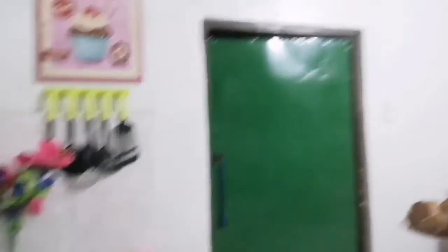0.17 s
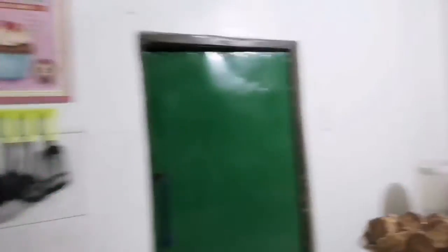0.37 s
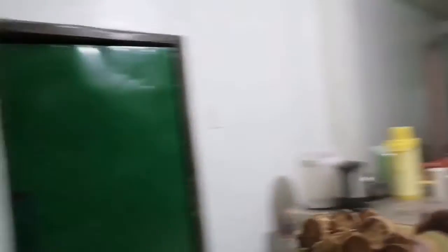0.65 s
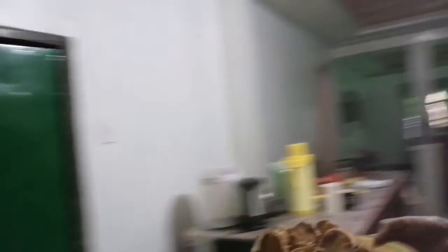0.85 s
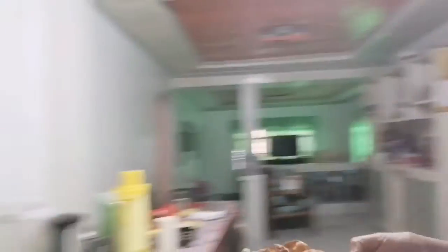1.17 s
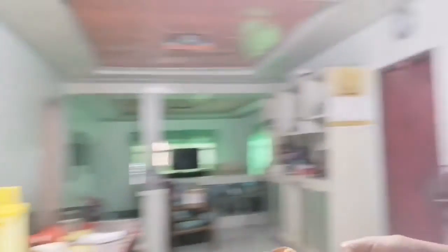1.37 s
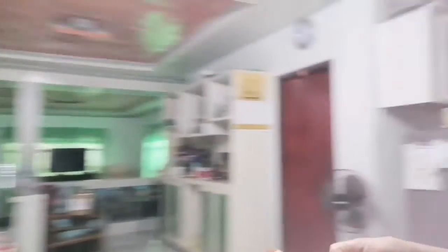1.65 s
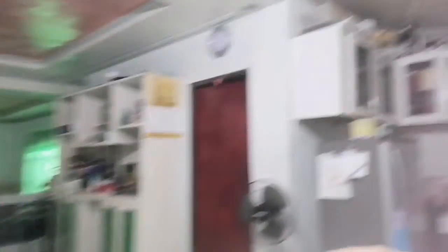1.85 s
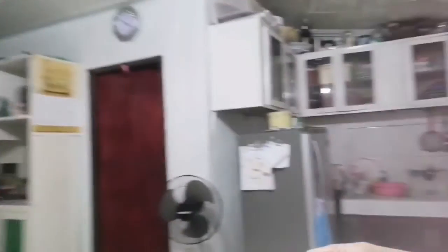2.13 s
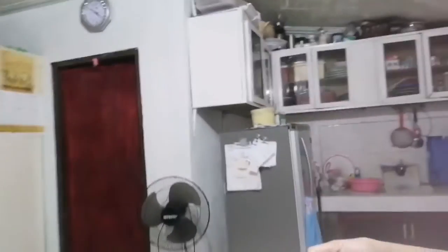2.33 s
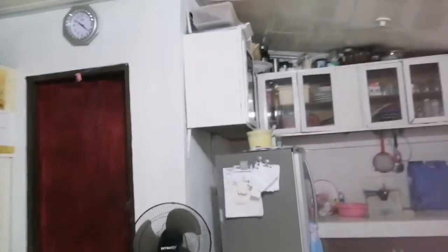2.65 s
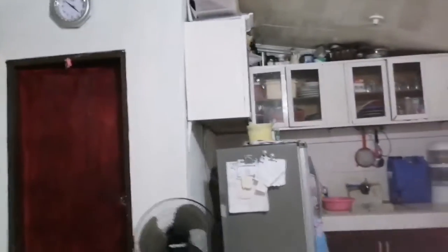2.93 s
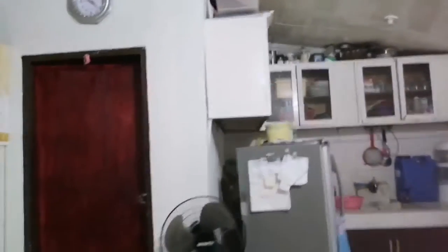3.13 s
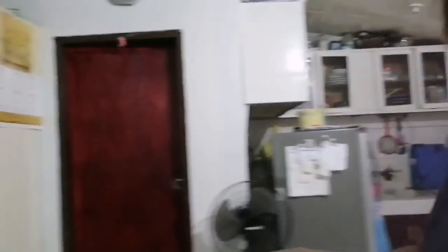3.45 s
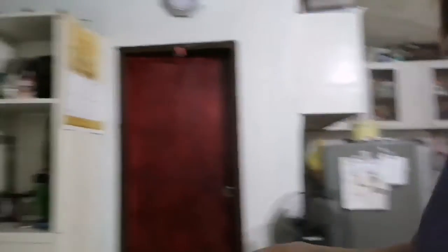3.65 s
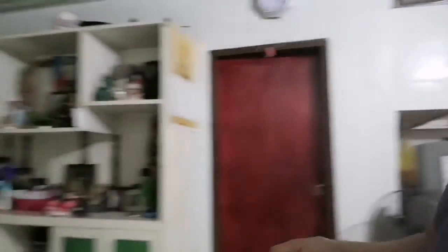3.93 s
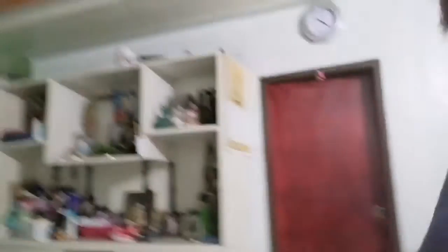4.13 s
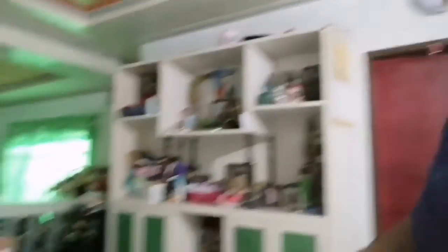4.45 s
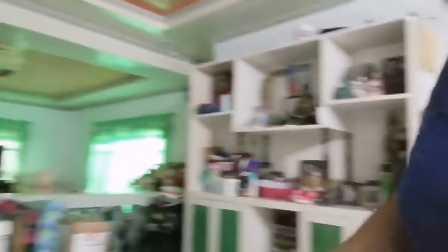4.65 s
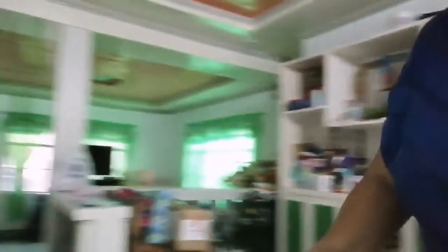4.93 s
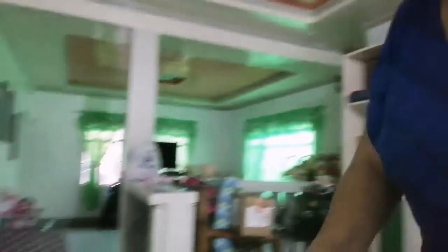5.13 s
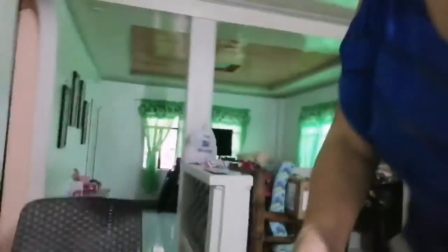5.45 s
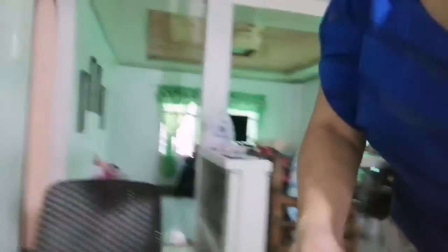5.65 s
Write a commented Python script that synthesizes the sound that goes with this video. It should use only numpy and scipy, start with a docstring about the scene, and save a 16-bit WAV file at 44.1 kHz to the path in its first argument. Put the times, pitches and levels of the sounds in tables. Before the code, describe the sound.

A rooster gasps and crows once, hoarse then clean and falling, ringing in a hard-walled house over faint hum, followed by light knocks and shuffles.

```python
"""Rooster crowing in a house

A rooster crows once between hard walls: a wheezy gasp, a hoarse two-voiced call, a clean falling last note.
The call is built from two sets of harmonics, one for each side of the voice organ, plus rasping noise.
A motor hums faintly, made of wavering tones in a dull rumble. Shaped noise makes the shuffles, rustles,
knocks and clicks; gliding tones make the squeaks, and low tones make the booms.
"""
import sys
import numpy as np
from scipy import signal
from scipy.fft import rfft, irfft, next_fast_len
from scipy.io import wavfile

SR = 44100
rng = np.random.default_rng(int(sys.argv[2]) if len(sys.argv) > 2 else 0)


def store_wav(level_fs):
    """Save 16-bit WAV to argv[1]."""
    pcm = np.round(np.clip(np.atleast_2d(level_fs), -1, 1) * 32767)
    wavfile.write(sys.argv[1], SR, pcm.T.astype(np.int16))


N = 255293
FFT_SIZE = next_fast_len(N, True)
TIME, BINS = np.arange(N) / SR, np.fft.rfftfreq(FFT_SIZE, 1 / SR)  # [s], [Hz]
# Levels in the tables are relative: the functions that play them may add a gain.


def amp(db):
    """Turns decibels into gain."""
    return 10 ** (np.asarray(db) / 20)


def unit(x):
    """Scales to rms 1."""
    return x / np.sqrt(np.mean(x ** 2) + 1e-20)


def read(points, hz):
    """Reads a spectrum's value at hz, on a log-frequency axis."""
    f, value = np.transpose(points)
    return np.interp(np.log(hz + 1), np.log(f + 1), value)


def curves(rows):
    """Draws each column of a timed table at every sample."""
    s, *columns = np.transpose(rows)
    return [np.interp(TIME, s, c) for c in columns]


def during(rows, fade=.008):
    """Gives 1 while a timed table lasts, with soft edges (fade in s)."""
    since_start, until_end = TIME - rows[0][0], rows[-1][0] - TIME
    return np.clip(np.minimum(since_start, until_end) / fade + .5, 0, 1)


def swell(start, attack, hold, release, db):
    """A gain that rises, holds, and then dies by 60 dB in the release time; times in s."""
    age = TIME - start
    return np.clip(age / attack, 0, 1) * amp(db - 60 * np.maximum(age - attack - hold, 0) / release)


def noise():
    """White noise."""
    return rng.standard_normal(N)


def filtered(x, gain):
    """Weights every frequency of x by a gain."""
    return irfft(rfft(x, FFT_SIZE) * gain, FFT_SIZE)[..., :N]


def wobble(hz):
    """Random drift with rms 1, up to about hz."""
    return unit(filtered(noise(), 1 / (1 + (BINS / hz) ** 4)))


def coloured(x, points):
    """Gives x a spectrum; rms 1."""
    return unit(filtered(x, amp(read(points, BINS))))


def resonant(x, modes):
    """Passes x through steep-sided resonances; rms 1."""
    power = sum(amp(db) ** 2 / (1 + ((BINS - hz) / width) ** 2 * 2) ** 3 for hz, width, db in modes)
    return unit(filtered(x, np.sqrt(power)))


def panned(left_db):
    """Gains of the left and the right channel, left_db apart."""
    return amp(np.array([[.5], [-.5]]) * left_db)


def pair(points, alike, left_db):
    """Coloured noise at both microphones; alike is the shared part of its power."""
    shared = noise()
    both = [coloured(np.sqrt(alike) * shared + np.sqrt(1 - alike) * noise(), points) for _ in range(2)]
    return np.array(both) * panned(left_db)


# How long echoes take to die by 60 dB: (frequency [Hz], time [s])
ROOM_T60 = [(150, 1), (500, 0.45), (1200, 0.45), (2800, 0.44), (7000, .52), (15000, 0.56)]


def room(x, build=0.002):
    """Dense reflections that swell quickly and die band by band, different at each microphone."""
    hz, t, z = signal.stft(rng.choice([-1., 1.], (2, SR)), SR, nperseg=256)
    decay = amp(-60 * t / read(ROOM_T60, hz)[:, None])
    tail = signal.istft(z * decay, SR, nperseg=256)[1]
    tail *= 1 - np.exp(-np.arange(tail.shape[1]) / SR / build)
    return signal.fftconvolve(x[None], tail / np.linalg.norm(tail[0]), axes=1)[:, :N]


def cycles(hz, rough, jitter=.055, jitter_hz=170, waver=.0022, rough_waver=.008):
    """Phase of a vibration whose period jitters as it gets rough."""
    fast = jitter * rough * wobble(jitter_hz)
    slow = (waver + rough_waver * rough) * wobble(30)
    return 2 * np.pi * np.cumsum(hz * (1 + fast + slow)) / SR


# The motor swells and fades: (time [s], firings per second [Hz], level [dB])
MOTOR = [(0, 33.5, -60), (.8, 34, -60), (1.6, 34, -69), (2.4, 32, -64), (3.2, 32, -57), (4.22, 31.8, -54),
         (4.4, 33, -45), (4.75, 33.3, -46), (5.1, 33.6, -54), (5.79, 34, -59)]
# Its tones: (multiple of the firing rate, level [dB])
MOTOR_ORDERS = [(1, 0), (2, 0.5), (3, -11), (4, -2), (5, 2), (6, -9.5)]
# Colour of its deep and upper rumble: (frequency [Hz], level [dB])
DEEP_COLOUR = [(10, -3.5), (32, -15), (48, -4.5), (70, -6), (100, 0.5), (140, -21), (300, -55.5)]
UPPER_COLOUR = [(60, -29), (120, -2), (165, 2), (205, -6.5), (260, -16), (450, -36), (1000, -64)]
# How each rumble follows the motor: (level when the motor is at MOTOR_REF_DB [dB], follow [dB per dB])
DEEP_RUMBLE = (-55.5, .7)
UPPER_RUMBLE = (-58.5, .4)
MOTOR_REF_DB = -58


def motor(gain_db=-3):
    """Wavering multiples of the firing rate in a dull rumble; only the bass comes through the walls."""
    hz, db = curves(MOTOR)
    phase = 2 * np.pi * np.cumsum(hz * (1 + 0.0083 * wobble(4.5))) / SR
    tones = np.zeros(N)
    for order, order_db in MOTOR_ORDERS:
        drift = wobble(1.7) + 2 * np.pi * rng.random()
        tones += amp(order_db + 2.5 * wobble(4.3)) * np.cos(order * phase + drift)
    deep, upper = (amp(base_db + follow * (db - MOTOR_REF_DB)) for base_db, follow in (DEEP_RUMBLE, UPPER_RUMBLE))
    rumble = deep * pair(DEEP_COLOUR, 0.89, 4.5) + upper * pair(UPPER_COLOUR, .85, 8.1)
    return amp(gain_db) * (amp(db) * unit(tones) * panned(4.6) + rumble)


# Colour of the still air: (frequency [Hz], level [dB])
AIR = [(180, -32), (300, -0.5), (821, -4.5), (953, -10), (1780, -13.5), (3280, -9), (4140, -11.5),
       (5570, -8.5), (7750, -23.5), (9600, -17.5), (15500, -29.5)]


def still_air(level_db=-69):
    """The steady faint hiss of the house, mostly different at each microphone."""
    return amp(level_db) * pair(AIR, 0.12, 0.67)


# Steps and shifts of the body: (start [s], length [s], scuffing feet [dB], rustling cloth [dB])
MOVES = [(.19, .33, -72, -68), (.72, .16, -63, -69), (3.42, .1, -63, -76), (3.76, .18, -62, -67),
         (4.08, .03, -59, -68), (4.35, .12, -60, -72), (4.46, .04, -55, -69), (4.52, .08, -49.5, -57.5),
         (4.7, .1, -65, -73), (4.86, .08, -64, -65), (5.03, .1, -64, -72), (5.13, .11, -62.5, -60.5),
         (5.33, .03, -52, -67), (5.43, .04, -50, -52), (5.54, .25, -58, -52), (5.765, .03, -42, -60)]
# Colour of the feet and of the cloth: (frequency [Hz], level [dB])
SCUFF_COLOUR = [(150, -9), (330, -2), (600, -5), (1000, -4.5), (1600, -13.5), (3000, -19.5), (5000, -67)]
CLOTH_COLOUR = [(880, -55), (1500, -37), (1580, -9.5), (3030, -4.5), (3760, -13), (6190, 2.5), (7230, -10),
                (7750, -14.5), (9890, -8.5), (11700, -22.5), (14200, -16), (15500, -47)]
MOVE_ATTACK_S, MOVE_RELEASE_S = .025, .4
STILL_SCUFF_DB, STILL_CLOTH_DB = -71, -75  # the faint stir between moves, before the gains below


def moving(scuff_gain_db=-2, cloth_gain_db=1):
    """Feet scuff the floor and cloth rubs softly, in small uneven catches."""
    scuff, cloth = amp(STILL_SCUFF_DB), amp(STILL_CLOTH_DB)
    for s, length, feet_db, rub_db in MOVES:
        scuff = np.hypot(scuff, swell(s, MOVE_ATTACK_S, length, MOVE_RELEASE_S, feet_db))
        cloth = np.hypot(cloth, swell(s, MOVE_ATTACK_S, length, MOVE_RELEASE_S, rub_db))
    catches_db = 1.5 * wobble(60)
    feet = scuff * amp(scuff_gain_db) * pair(SCUFF_COLOUR, 0.35, 1)
    return feet + cloth * amp(cloth_gain_db + catches_db) * pair(CLOTH_COLOUR, 0.15, 7)


# Faint high squeaks and swishes:
# (start [s], length [s], start pitch [Hz], end pitch [Hz], level [dB], roughness [0-1])
SQUEAKS = [(.02, 0.086, 4990, 4340, -56.5, 1), (0.031, 0.084, 3700, 3230, -57, 1),
           (0.182, 0.28, 5970, 5730, -58.5, 0.86), (0.202, 0.28, 3260, 3120, -65, 0.94),
           (.47, 0.076, 5500, 5270, -59.5, 0.91), (4.146, 0.14, 4990, 4866, -52, 0.6),
           (4.187, 0.13, 3800, 3570, -66, 0.13), (5.176, 0.11, 4680, 4560, -56.5, 0.25)]


def squeaks():
    """Tones that glide, swell and fade; the rougher they are, the more their pitch jitters into a swish."""
    out = np.zeros(N)
    for s, length, start_hz, end_hz, db, rough in SQUEAKS:
        u = np.clip((TIME - s) / length, 0, 1)  # progress, 0 to 1
        glide_hz = start_hz + (end_hz - start_hz) * u
        out += amp(db) * np.sin(np.pi * u) * np.sin(cycles(glide_hz, rough))
    return .5 * out + room(out)


# Three overlapping parts of the gasp: (start [s], attack [s], hold [s], release [s], level [dB])
GASP_WHISTLE = (.891, .012, .004, .1, -26)
GASP_SIBILANCE = (.874, .034, .04, .15, -34)
GASP_BREATH = (.93, .02, .05, .03, -35.5)
# Resonances of its hiss and its rush of air: (frequency [Hz], width [Hz], level [dB])
GASP_HISS = [(6310, 320, 7.5), (6210, 1830, -8), (9680, 1600, -9), (13700, 3000, -20.5)]
GASP_RUSH = [(760, 217, 4), (1810, 1800, -9), (3000, 480, -3.5)]


def gasp(whistle_hz=2965, flutter_hz=185, flutter=.35, unsteady=0.18):
    """The bird's wheeze: a fluttering whistle, with breath noise shaped into a hiss and a rush."""
    tone = np.sqrt(2) * np.sin(cycles(whistle_hz, unsteady))
    whistle = tone * (1 + flutter * np.sin(2 * np.pi * flutter_hz * TIME))
    hiss, rush = resonant(noise(), GASP_HISS), resonant(noise(), GASP_RUSH)
    sibilance = swell(*GASP_SIBILANCE) * (hiss + amp(-10) * rush)
    return swell(*GASP_WHISTLE) * whistle + sibilance + swell(*GASP_BREATH) * rush


# The rasp of chaotic beating: (time [s], level [dB])
RASP_LEVEL = [(1.25, -37), (1.3, -33), (1.33, -20), (1.47, -25), (1.55, -42), (1.62, -33), (1.77, -29),
              (1.84, -23.5), (2.0, -26.5), (2.3, -22.5), (2.49, -34), (2.57, -25), (2.66, -47), (3.1, -65),
              (3.5, -59)]
# Throat resonances: (frequency [Hz], width [Hz], level [dB])
THROAT = [(687, 90, -7.5), (867, 130, -5.5), (1089, 140, -3.5), (1432, 163, 0), (1751, 83, 3),
          (2082, 260, -13.5), (2739, 200, -5)]
# Treble of the rasp: (frequency [Hz], level [dB])
RASP_TOP = [(2400, -15), (3100, -19), (3700, -18.5), (4400, -21.5), (5200, -30.5), (6200, -24), (7150, -15),
            (7600, -32.5), (9800, -25), (11500, -33), (15500, -38.5)]
# The wheeze in the opening note: (time [s], level [dB])
WHEEZE = [(1.28, -63), (1.32, -45), (1.37, -43), (1.42, -59), (1.48, -64)]
# Its resonance: (frequency [Hz], width [Hz], level [dB])
WINDPIPE = [(5350, 350, 0)]
# Hiss in the rasp, relative to the rasp and to the level of the notes [dB]
RASP_HISS_DB, NOTE_HISS_DB = -15.5, -15


def rasp(rough, puff_hz=900):
    """Chaotic puffs of air, one a cycle, ring the throat; the windpipe wheezes as the call opens."""
    level = amp(curves(RASP_LEVEL)[0]) * during(RASP_LEVEL)
    notes = sum(amp(curves(rows)[1]) * during(rows) for rows in (SHORT_NOTE, HIGH_NOTE, CLEAN_NOTE, LAST_NOTE))
    puffs = noise() * (1 + 0.59 * np.cos(cycles(puff_hz, rough))) * amp(2.9 * wobble(120))
    # the chaos favours now one resonance, now another
    favour_db = 3.5 * wobble(16)
    throat = np.zeros(N)
    for hz, width, db in THROAT:
        gain = amp(db + np.roll(favour_db, rng.integers(N))) * np.sqrt(width)
        throat += gain * resonant(puffs, [(hz, width, 0)])
    hiss_level = np.hypot(amp(RASP_HISS_DB) * level, amp(NOTE_HISS_DB) * notes * np.sqrt(rough))
    hiss = hiss_level * coloured(puffs, RASP_TOP)
    wheeze = amp(curves(WHEEZE)[0]) * resonant(puffs, WINDPIPE) * during(WHEEZE)
    return 0.72 * level * unit(throat) + hiss + wheeze


# Overtones follow the note's level in part [dB per dB], and fade as the membrane slackens to a low pitch
USUAL_LEVEL_DB, OVERTONE_FOLLOW, SLACK_DB_PER_HZ = -25, .55, .16


def note(rows, body, overtones, slack_hz, rough, top_db, bloom_db, bloom_s,
         shimmer=0.4, flicker_db=4, half_db=-31, count=27):
    """One side of the syrinx (voice organ): three strong harmonics, and overtones coloured by the windpipe."""
    on = during(rows) > 0
    pitch, level = curves(rows)
    hz, level_db = pitch[on], level[on]
    # overtones bloom after the note starts
    not_yet_db = bloom_db * np.exp(-(TIME[on] - rows[0][0]) / bloom_s)
    dull_db = not_yet_db + SLACK_DB_PER_HZ * np.maximum(slack_hz - hz, 0)
    bright_db = top_db + OVERTONE_FOLLOW * (level_db - USUAL_LEVEL_DB) - dull_db
    phase, out = cycles(pitch, rough)[on], np.zeros(N)
    flicker = flicker_db * wobble(6.2)
    for k in range(1, count):
        if k <= 3:
            db = level_db + read(body, k * hz)
        else:  # each overtone comes and goes by itself
            db = bright_db + read(overtones, k * hz) + np.roll(flicker, rng.integers(N))[on]
        out[on] += np.sqrt(2) * amp(db) * np.cos(k * phase)
    # strong and weak beats put faint half lines on both sides of the second harmonic
    out[on] += 2 * amp(half_db + level_db) * np.cos(2 * phase) * np.cos(phase / 2) * wobble(20)[on]
    return out * during(rows) * (1 + shimmer * rough * wobble(200))


# The low side opens with a yelp, drones under the hoarse middle and ends the call:
# (time [s], pitch [Hz], level [dB])
OPENING_NOTE = [(1.253, 605, -25), (1.267, 622, -15), (1.278, 725, -30), (1.298, 734, -19.5),
                (1.315, 660, -32), (1.39, 680, -30), (1.465, 684, -25), (1.5, 676, -43), (1.57, 692, -43)]
LOW_NOTE = [(1.69, 743, -29), (1.76, 738, -30), (1.86, 731, -24), (2.05, 719, -30), (2.26, 715, -23),
            (2.42, 730, -28), (2.51, 718, -24), (2.56, 701, -40)]
LAST_NOTE = [(3.19, 727, -23.5), (3.29, 694, -30), (3.4, 673, -22), (3.435, 660, -28), (3.458, 608, -30),
             (3.485, 575, -45)]
# The high side sings a short note, a long hoarse one, and a clean one that falls:
# (time [s], pitch [Hz], level [dB])
SHORT_NOTE = [(1.585, 866, -31), (1.62, 894, -21), (1.675, 921, -17), (1.74, 912, -26), (1.78, 913, -29)]
HIGH_NOTE = [(1.78, 914, -28), (1.93, 916, -21.5), (2.14, 897, -21), (2.25, 888, -28), (2.36, 885, -37),
             (2.56, 875, -41)]
CLEAN_NOTE = [(2.56, 875, -41), (2.62, 880, -21), (2.74, 877, -19), (2.84, 876, -21.5), (2.885, 873, -28),
              (2.96, 858, -16.5), (3.0, 844, -26), (3.13, 810, -29), (3.2, 775, -28)]
# A stray tone slides down as the two sides lock into one pitch: (time [s], pitch [Hz], level [dB])
SLIDE = [(2.3, 1100, -31.5), (2.4, 1116, -32), (2.5, 1142, -42), (2.55, 1090, -33), (2.6, 1020, -22),
         (2.63, 998, -42)]
# How the throat weights the first three harmonics of each side: (frequency [Hz], level [dB])
LOW_BODY = [(615, 0), (680, -4), (735, -7), (1220, -15), (1350, -.5), (1450, 3.5), (1900, -22), (2200, -22)]
HIGH_BODY = [(775, -7), (855, -8.5), (882, -3), (915, 2), (1550, 1), (1750, 1), (1830, -2), (2400, -15),
             (2575, -2.5), (2640, -11), (2760, -5)]
# Colour of each side's overtones: (frequency [Hz], level [dB])
LOW_OVERTONES = [(2750, 4), (3400, -26), (4200, -31.5), (5400, -11), (6200, -21), (7100, -21.5),
                 (7900, -37), (9600, -23.5), (11500, -33.5), (15800, -31)]
HIGH_OVERTONES = [(3500, -13), (4400, -25), (4900, -11.5), (5230, 5), (5500, -17), (6100, -14), (7000, -16),
                  (7900, -32.5), (9200, -16.5), (11500, -30.5), (13300, -24), (15800, -29)]
HIGH_SLACK_HZ, LOW_SLACK_HZ = 878, 690  # each side goes slack below its own pitch
FULL_ROUGH_DB, LEAST_ROUGH = -17, .025  # rasp level for fully rough membranes; roughness without rasp


def crow(high_db=-2.5, low_db=-1, drone_db=-4.5):
    """The two sides sound in turn and, in the hoarse middle, together; more rasp makes them beat less evenly."""
    rough = np.clip(LEAST_ROUGH + amp(curves(RASP_LEVEL)[0] - FULL_ROUGH_DB), 0, 1)
    high_side = (HIGH_BODY, HIGH_OVERTONES, HIGH_SLACK_HZ, rough)
    low_side = (LOW_BODY, LOW_OVERTONES, LOW_SLACK_HZ, rough)
    low = (note(OPENING_NOTE, *low_side, top_db=-35, bloom_db=3, bloom_s=.05)
           + note(LAST_NOTE, *low_side, top_db=-35, bloom_db=10, bloom_s=.08))
    high = (note(SHORT_NOTE, *high_side, top_db=-38, bloom_db=6, bloom_s=.02)
            + note(HIGH_NOTE, *high_side, top_db=-45, bloom_db=6, bloom_s=.02)
            + note(CLEAN_NOTE, *high_side, top_db=-28.5, bloom_db=30, bloom_s=.13))
    drone = note(LOW_NOTE, *low_side, top_db=-38, bloom_db=12, bloom_s=.1)
    hz, db = curves(SLIDE)
    slide = np.sqrt(2) * amp(db) * np.sin(cycles(hz, rough)) * during(SLIDE)
    return amp(high_db) * high + amp(low_db) * low + amp(drone_db) * drone + slide + rasp(rough)


# The microphones turn through the room: (time [s], left over right [dB])
FACING = [(.9, 3), (1.3, 3), (2.2, -1), (2.8, -1.5), (3.2, 1), (3.6, 3)]
# Left-right balance of the rooster's sound at each frequency: (frequency [Hz], left over right [dB])
BALANCE = [(700, -1.5), (1300, -1.5), (2700, 1), (4000, 2.5), (5300, 6.5), (7000, 5), (9500, -5),
           (14000, 2)]


def rooster(direct_db=-4.5, room_db=.4, left_lag_s=.00025, lowest_hz=480):
    """The bird is heard mostly by way of the walls, while the microphones turn."""
    no_bass = 1 - 1 / (1 + (BINS / lowest_hz) ** 8)  # a small beak radiates no bass
    call = filtered(crow(), no_bass) + gasp()
    direct = np.array([np.interp(TIME - left_lag_s, TIME, call), call])
    sound = amp(direct_db) * direct + amp(room_db) * room(call)
    return filtered(sound, panned(read(BALANCE, BINS))) * panned(curves(FACING)[0])


# Dull booms through the walls: (middle [s], length [s], pitch [Hz], level [dB])
BOOMS = [(3.22, .2, 160, -52), (3.63, .12, 88, -51), (3.78, .16, 85, -46), (3.82, .25, 160, -52),
         (4.16, .24, 157, -43), (4.4, .2, 66, -47), (4.43, .16, 180, -47)]


def booms(unsteady=.06, left_db=5):
    """Low wavering tones that swell and fade."""
    out = np.zeros(N)
    for s, length, hz, db in BOOMS:
        arch = np.cos(np.pi * np.clip((TIME - s) / length, -.5, .5))
        phase = 2 * np.pi * np.cumsum(hz * (1 + unsteady * wobble(25))) / SR
        out += amp(db) * arch * np.sin(phase)
    return out * panned(left_db)


def hit(s, db, modes, t60):
    """A sudden burst of noise in the given resonances that dies by 60 dB in t60 seconds."""
    age = np.maximum(TIME - s, 0)
    return (TIME >= s) * amp(db - 60 * age / t60) * resonant(noise(), modes)


# Light knocks: (time [s], level [dB])
KNOCKS = [(3.778, -38), (3.856, -49.5), (3.909, -37.5)]
# The wood's modes: (frequency [Hz], width [Hz], level [dB])
WOOD = [(552, 370, -3.5), (980, 390, 8.5), (1277, 230, -4), (2820, 1500, -34)]


def knocks(room_db=4.5):
    """Short bursts ring the wood's modes, and the room answers."""
    dry_knocks = sum(hit(s, db, WOOD, t60=0.033) for s, db in KNOCKS)
    return dry_knocks + amp(room_db) * room(dry_knocks)


# Small clicks: (time [s], level [dB], centre [Hz], width [Hz], decay by 60 dB [s], left over right [dB])
CLICKS = [(5.04, -54, 11000, 5926, .008, -3), (5.245, -46, 4740, 6000, 0.009, 16),
          (5.372, -40.5, 9400, 3500, .045, 2), (5.379, -50.5, 4020, 6000, 0.018, -19),
          (5.441, -46, 3000, 6130, 0.08, 6)]


def clicks(room_db=-5):
    """Bursts of noise in one wide band each, placed left or right, with some room."""
    dry_clicks = np.zeros((2, N))
    for s, db, hz, width, t60, left_db in CLICKS:
        dry_clicks += hit(s, db, [(hz, width, 0)], t60) * panned(left_db)
    return dry_clicks + amp(room_db) * room(dry_clicks.mean(0))


def scene():
    """Everything together over the still air of the house."""
    background = motor() + still_air() + booms()
    return background + moving() + squeaks() + rooster() + knocks() + clicks()


def record(dry, edge_hz=15750):
    """Takes away everything above the edge frequency."""
    lowpass = signal.firwin(511, edge_hz, window=("kaiser", 9), fs=SR)
    return signal.oaconvolve(dry, lowpass[None], "same")


dry = scene()
out = record(dry)
store_wav(out)
```